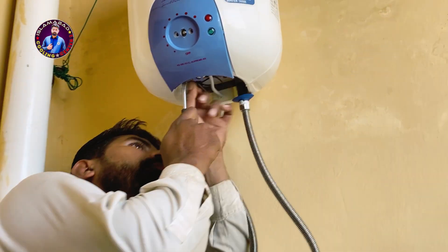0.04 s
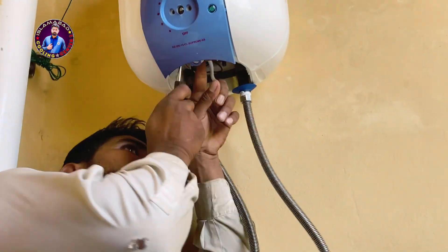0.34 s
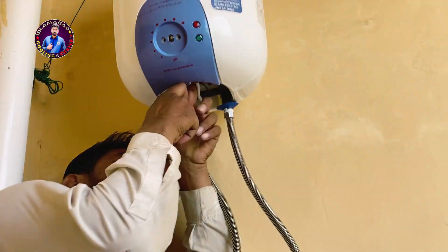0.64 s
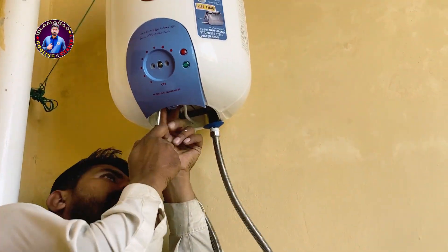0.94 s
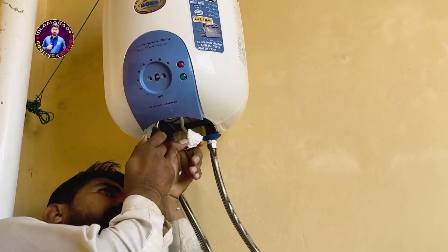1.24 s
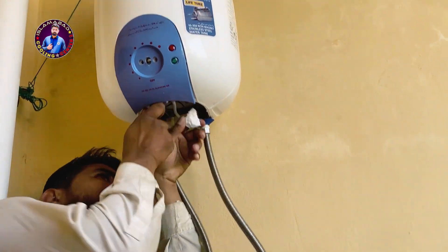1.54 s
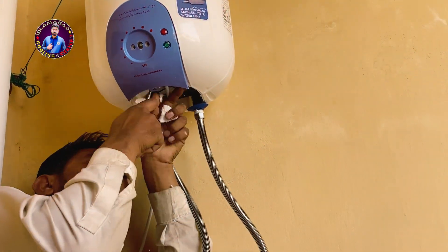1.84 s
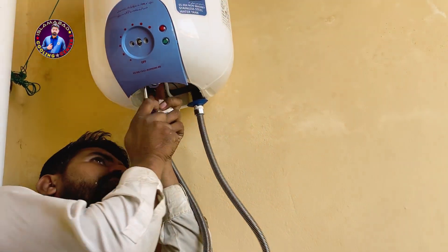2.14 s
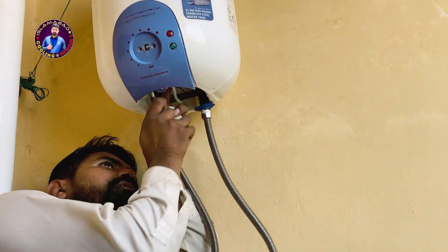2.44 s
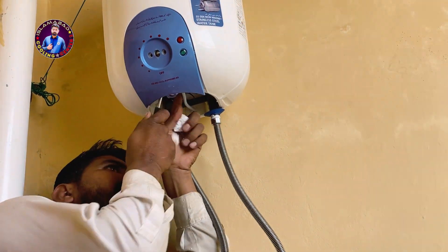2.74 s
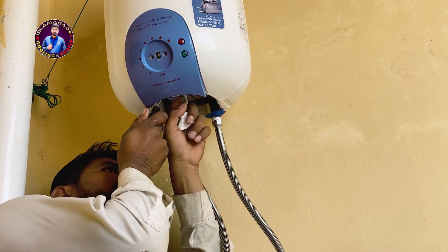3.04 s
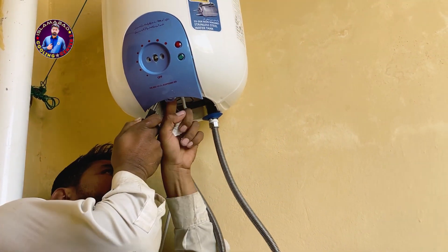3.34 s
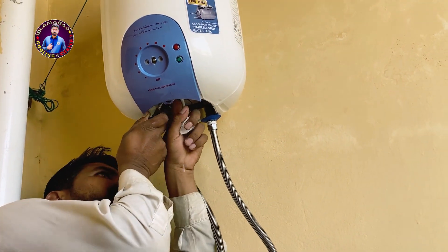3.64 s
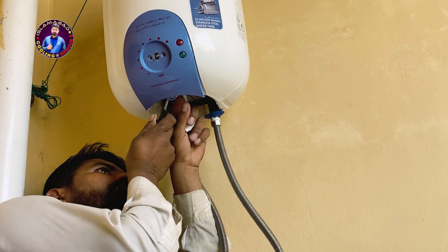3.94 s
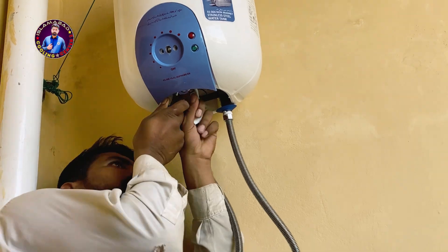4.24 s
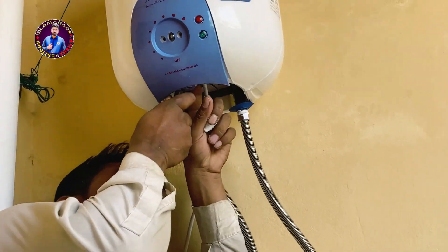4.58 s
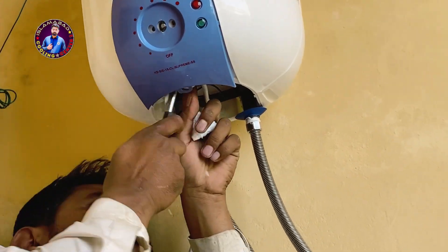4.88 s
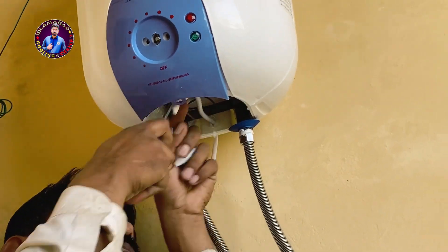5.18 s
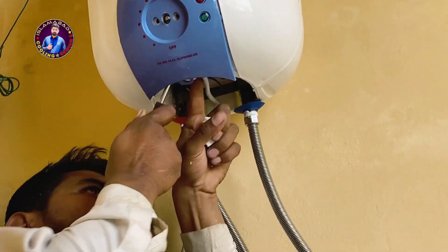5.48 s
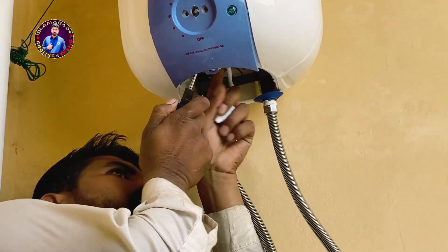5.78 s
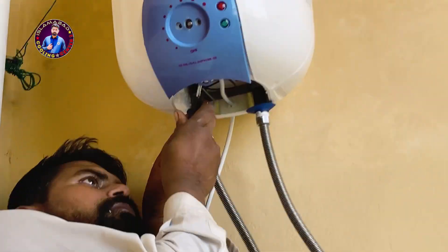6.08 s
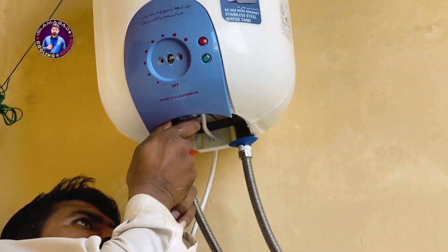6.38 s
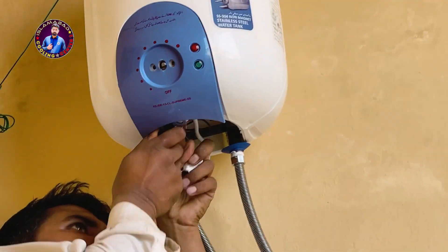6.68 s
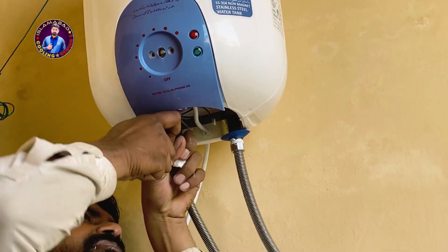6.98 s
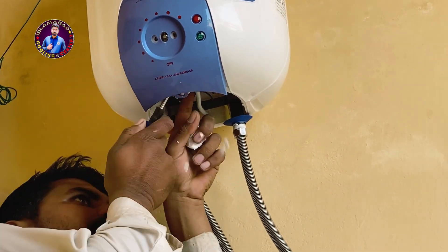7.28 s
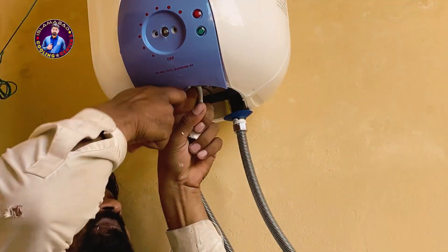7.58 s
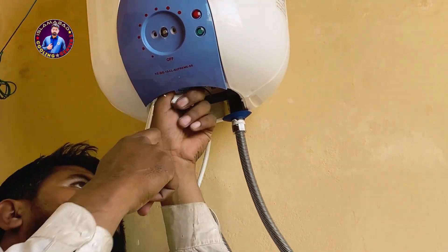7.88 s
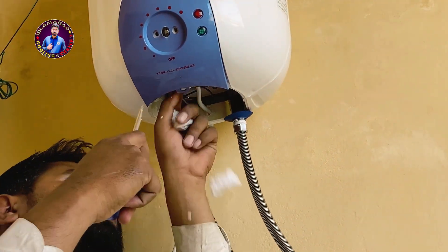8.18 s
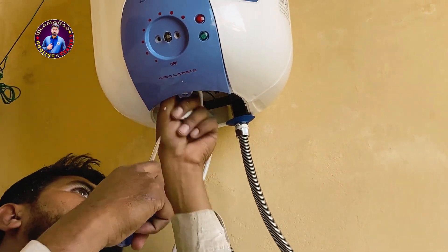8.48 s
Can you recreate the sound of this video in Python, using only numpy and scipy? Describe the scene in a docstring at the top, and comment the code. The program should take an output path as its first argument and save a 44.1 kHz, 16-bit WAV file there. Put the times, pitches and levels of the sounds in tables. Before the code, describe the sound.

Close up in a quiet room, a blade cracks through hard foam and knocks against a plastic shell in uneven clusters, with light scraping and ticking crumbs between. After a quieter stretch in the middle, the snaps build again, the loudest slightly overloading the microphone, with dull thuds and a soft drag of a hand. Light picks finish. A distant motor and brief gliding whistles are barely audible.

```python
"""Indoors at a wall-mounted water heater, microphone close: a screwdriver picks hard foam out of the
plastic housing. At first a motor revs far off while the blade snaps through the foam and knocks on the
shell, which rings briefly. Around 3 s the work is quieter: foam rasps, crumbs tick. Then more snaps,
hardest near 7 and 7.6 s, with dull thuds and a dragging hand; light picks end it. Throughout, loud snaps
overload the microphone, a noise suppressor hushes the pauses, and faint whistles glide now and then."""
import sys
import numpy as np
from scipy import signal
from scipy.fft import rfft, irfft
from scipy.io import wavfile
from scipy.ndimage import uniform_filter1d

SR = 44100
rng = np.random.default_rng(int(sys.argv[2]) if len(sys.argv) > 2 else 0)


def dump(signal):
    """Clip the signal to [-1, 1] and save it as 16-bit WAV at the path in sys.argv[1]."""
    limited = np.clip(np.atleast_2d(signal).T, -1, 1)
    pcm = np.round(limited * 32767).astype(np.int16)
    wavfile.write(sys.argv[1], SR, pcm)


N = 384552
TIME = np.arange(N) / SR
CUTOFF_HZ = 16000


# spectra of the splintering crack, clattering shell and hissing foam: (frequency [Hz], level [dB])
CRACK_SPECTRUM = [(100, -52), (600, -15.5), (1500, 2), (4400, -1.5), (6500, -22.5), (9000, -25.5),
                  (16000, -40)]
SHELL_SPECTRUM = [(100, -46.5), (350, -37.5), (480, -17.5), (900, -6), (1400, 1.5), (1850, -2), (2300, -5),
                  (4300, -8.5), (5200, -13.5), (6300, -33.5), (16000, -63.5)]
HISS_SPECTRUM = [(800, -38.5), (2000, -12), (4200, -1), (5400, -3), (6600, -12.5), (7800, -7), (8800, -2.5),
                 (10600, 1), (12500, -7), (15500, -15.5), (17000, -29.5)]
# blade snapping through foam; levels are relative within each column:
# (time [s], crack level [dB], ping pitch [Hz], shell level [dB], crunch level [dB])
BLADE_SNAPS = [(0.1714, -25.5, 1530, -47, -60), (0.3077, -20, 1460, -47, -59),
               (0.3417, 6.5, 2850, -14.5, -72), (0.4528, -14.5, 2010, -49, -71),
               (0.6868, 10.5, 9910, -50, -36), (0.7293, 3.5, 1670, -15, -24), (0.7502, 9.5, 2764, -15, -39),
               (0.8401, -23, 3920, -52, -76), (0.9366, -27.5, 1980, -50, -63), (1.27, -38, 1770, -51, -51),
               (1.4256, -11.5, 1840, -32.5, -53.5), (1.5098, -11.5, 1710, -28, -36),
               (1.5755, -18.5, 1070, -26.5, -71), (1.6367, 7.5, 8790, -50, -28),
               (1.6624, -2, 1750, -17, -41), (1.7443, 12.5, 1370, -9.5, -24.5),
               (1.7688, 10.5, 1400, -8, -21), (1.8863, -12, 1770, -31.5, -90.5),
               (2.1166, -8.5, 2480, -18.5, -62.5), (2.2784, -25, 855, -63, -58.5),
               (2.426, 8, 1796, -15, -50), (2.4778, -6, 1780, -22, -44), (2.5005, 3, 4190, -17, -29),
               (2.5307, -4.5, 1120, -17.5, -57), (2.5845, -4, 1620, -13, -25.5),
               (2.7132, -27.5, 1580, -36.5, -79.5), (2.9698, -27.5, 10480, -59, -49),
               (3.0144, -20.5, 1450, -25, -65), (3.058, -21, 1470, -33, -58),
               (3.361, -34, 1454, -41.5, -63.5), (3.461, -37.5, 1710, -52, -79.5),
               (3.5508, -23, 1230, -37, -57.5), (3.6447, -28, 3460, -42, -86),
               (3.7227, -33.5, 1440, -39.5, -59.5), (4.1856, -9.5, 1426, -28.5, -53),
               (4.2254, -27, 1580, -31.5, -66), (4.3082, -6.5, 1780, -21.5, -58),
               (4.388, -6.5, 1490, -21, -56), (4.6041, -17.5, 3980, -23, -45),
               (4.7479, 6.5, 1300, -3.5, -33), (4.8829, 4, 1655, -14, -40), (4.9327, -1.5, 2490, -18, -74),
               (5.0062, 1.5, 1666, -14, -39), (5.1228, -5.5, 1583, -30.5, -49),
               (5.4124, -34, 1106, -34.5, -64.5), (5.5062, -16.5, 1007, -23.5, -47.5),
               (5.6619, -24.5, 1540, -39.5, -85), (5.674, -19, 1510, -42, -85),
               (5.6959, -23.5, 1475, -42.5, -92), (5.7418, -21.5, 1604, -40, -76),
               (6.1253, -31.5, 1783, -40.5, -54), (6.1968, -16, 2800, -46.5, -75),
               (6.2558, -16, 1470, -17.5, -49.5), (6.2729, -8.5, 1880, -21.5, -69),
               (6.4238, -12, 1520, -49, -31), (6.4566, -6.5, 1360, -23, -39.5),
               (6.5253, -4.5, 1556, -27.5, -57), (6.5665, -23.5, 1430, -54, -75),
               (6.771, -14.5, 1376, -30, -64), (6.7898, -18, 1003, -43, -65), (6.9051, 0, 1720, -16, -24.5),
               (6.9423, 15, 1397, -10.5, -26), (7.1118, -11.5, 1710, -20.5, -68),
               (7.149, -13.5, 2000, -23, -81), (7.4242, -5.5, 1486, -20, -52),
               (7.5229, -15, 1320, -30, -61.5), (7.5859, 11.5, 1310, -14, -23),
               (7.6064, 10.5, 1380, -12.5, -24.5), (7.6266, 6.5, 4190, -13, -40),
               (7.9898, -19, 1430, -37, -52.5), (8.0139, -13.5, 1410, -23.5, -51.5),
               (8.0553, -13.5, 1724, -29, -61.5), (8.501, -20.5, 1570, -30, -68.5),
               (8.6071, -20, 1198, -46, -77)]
def snaps(rows):
    """Close up, each snap is a crack with a short ping, a knock on the shell and a crunch of torn cells."""
    t = np.arange(SR // 7) / SR
    crack, struck, crunch = np.zeros((3, N))
    ping_attack = (1 - np.exp(-t / 0.00026)) ** 2
    crunch_attack = 1 - np.exp(-t / 0.00009)
    clatter = coloured(from_db(3.4 * drift(260)) * grains(3000, 0.6, smooth=0.82), SHELL_SPECTRUM)
    for s, crack_db, ping_hz, shell_db, crunch_db in rows:
        add(struck, s, shell_knock(t, shell_db, clatter))
        # a gentle pick is mostly ping, and a longer one; only a hard pick splinters across the band
        ping_shape = ping_attack * decay(t, t60=0.0052 * (1 + 0.1048 * max(-crack_db, 0)))
        add(struck, s, from_db(crack_db + 4) * ping_shape * np.sin(2 * np.pi * ping_hz * t))
        splinter_db = crack_db - 8 + 0.36 * min(crack_db + 7.5, 0)
        splinter = decay(t, t60=0.011) * rng.standard_normal(len(t))
        add(crack, s, from_db(splinter_db) * hollow(splinter, depth=0.89))
        add(crunch, s, from_db(crunch_db + 13.5) * crunch_attack * decay(t, t60=0.05))
    # small parts radiate little bass
    struck = signal.sosfilt(signal.butter(3, 430, "high", fs=SR, output="sos"), struck)
    torn_cells = crunch * grains(3500, 3.5, smooth=0.5)
    return struck + coloured(crack, CRACK_SPECTRUM) + coloured(torn_cells, HISS_SPECTRUM)


# resonances of the plastic housing: (frequency [Hz], level [dB])
HOUSING_MODES = [(466, -25), (700, -7.5), (880, -11), (1074, -9), (1200, 1.5), (1250, -1.5), (1412, -2.5),
                 (1454, 3.5), (1573, -2.5), (1714, 2.5), (1802, -1), (2083, -9), (2252, -12.5), (2730, -2),
                 (3467, -6.5), (4122, -2.5)]
def shell_knock(t, shell_db, clatter, rebound_s=0.007, rebound_db=-9.5):
    """The blade strikes the shell, springs back and knocks again more softly; the shell rings."""
    mode_hz, mode_db = np.transpose(HOUSING_MODES)[:, :, None]
    # the ring takes a moment to spread, then cuts off quickly
    build_up = (1 - np.exp(-t / 0.0025)) ** 2
    cut_off = np.exp(-(t / 0.062) ** 4)
    # light touches ring more briefly than hard ones
    t60 = np.clip(0.05 + 0.0065 * (shell_db + 17.5), 0.05, 0.1)
    ring = build_up * cut_off * decay(t, t60)
    rebound = from_db(rebound_db) * np.interp(t - rebound_s, t, ring)
    # where the blade lands decides which modes answer
    strengths = from_db(mode_db + 4.6 * rng.standard_normal(mode_db.shape))
    # the blade keeps chattering against the shell and knocks each mode out of phase
    phase = rng.uniform(0, 2 * np.pi, mode_hz.shape)
    chatter = np.cumsum(0.045 * rng.standard_normal((len(mode_hz), len(t))), axis=1)
    modes = strengths * np.sin(2 * np.pi * mode_hz * t + phase + chatter)
    tone = from_db(shell_db + 7.5) * modes.sum(0) / np.linalg.norm(strengths)
    at = rng.integers(N - len(t))
    rattle = from_db(shell_db + 4.5) * hollow(clatter[at:at + len(t)], depth=1.0)
    knock = np.hypot(ring, rebound) * (tone + rattle)
    # a gentle touch is a soft contact, and the shell answers it without treble
    contact_hz = np.clip(14000 * 2 ** (shell_db / 13), 2297, CUTOFF_HZ)
    return signal.lfilter(*signal.butter(2, contact_hz, fs=SR), knock)


# spectrum of foam rasping against the shell: (frequency [Hz], level [dB])
RASP_SPECTRUM = [(300, -33), (700, -11), (1100, -11), (1500, 1.5), (2200, -9), (3000, -8.5), (4400, -12.5),
                 (5500, -15), (7000, -20.5)]
# blade and fingers pushing through foam: (start [s], end [s], rasp level [dB], hiss level [dB])
FOAM_STROKES = [(0.172, 0.223, -56, -54.5), (0.365, 0.423, -41, -53), (0.486, 0.709, -46.5, -61.5),
                (0.677, 0.743, -28.5, -31.5), (0.802, 0.847, -51, -44), (0.973, 1.027, -49, -56.5),
                (1.088, 1.189, -51.5, -42.5), (1.365, 1.472, -50.5, -65), (1.49, 1.55, -21, -48),
                (1.575, 1.694, -39, -43.5), (2.053, 2.272, -47, -65), (2.343, 2.434, -54, -58),
                (2.456, 2.635, -31.5, -43), (2.79, 2.958, -52, -80), (2.971, 3.142, -42, -61.5),
                (3.228, 3.414, -52.5, -71), (3.511, 3.599, -42, -63.5), (3.78, 4.15, -51, -76.5),
                (4.557, 4.769, -48, -62.5), (5.076, 5.184, -47, -54), (5.209, 5.248, -66, -55),
                (5.427, 5.643, -48, -70), (5.823, 6.101, -54, -70.5), (6.324, 6.381, -61.5, -50),
                (6.376, 6.513, -36.5, -55), (6.62, 6.66, -49, -56), (6.734, 6.941, -50, -65),
                (7.176, 7.231, -47.5, -58.5), (7.365, 7.46, -40.5, -60), (7.551, 7.67, -38, -54),
                (7.782, 7.977, -51, -64), (7.98, 8.063, -45.5, -56), (8.289, 8.393, -47, -64.5),
                (8.41, 8.584, -48.5, -61)]
def scraping():
    """The blade sticks and slips: a coarse rasp through the shell, a fine hiss straight from the foam."""
    coarse = rms_one(coloured(pitched_grains(750, 5400, per_s=300, cycles=16), RASP_SPECTRUM))
    fine = rms_one(coloured(pitched_grains(3200, 15000, per_s=1400, cycles=12), HISS_SPECTRUM))
    out = np.zeros(N)
    for start, end, rasp_db, hiss_db in FOAM_STROKES:
        stroke = swell(end - start, rise=0.026, fall=0.005)
        span = slice(int(start * SR), int(start * SR) + len(stroke))
        friction = from_db(rasp_db + 0.5) * coarse[span] + from_db(hiss_db + 5.5) * fine[span]
        add(out, start, stroke * hollow(friction, depth=0.54))
    grip = from_db(4.5 * drift(70))
    return grip * out


def crumbs(count=70):
    """Crumbs break off and tick during the strokes, louder under a harder one; rows for snaps()."""
    which, when, size, pitch, crisp = rng.random((count, 5)).T
    start, end, rasp_db, _ = np.array(FOAM_STROKES)[(which * len(FOAM_STROKES)).astype(int)].T
    times = start + (end - start) * when
    crack_db = rasp_db + 8 + 14.5 * size ** 2
    ping_hz = 1200 + 900 * pitch
    shell_db, crunch_db = crack_db - 17, crack_db - 50.5 + 18 * crisp
    return np.column_stack([times, crack_db, ping_hz, shell_db, crunch_db])


# short, dull thuds, mostly under snaps: (time [s], level [dB])
LOW_THUDS = [(0.004, -26), (2.505, -19.5), (4.385, -29.5), (4.932, -23.5), (6.452, -22.5), (6.523, -20.5),
             (7.149, -23), (7.424, -26), (7.626, -9)]
def thuds():
    """Quickly dying bursts of low noise give some snaps a dull body."""
    t, envelope = np.arange(SR // 5) / SR, np.zeros(N)
    for s, db in LOW_THUDS:
        add(envelope, s, from_db(db - 4) * decay(t, t60=0.072))
    band = signal.butter(3, [330, 850], "band", fs=SR, output="sos")
    white = rng.standard_normal(N)
    return signal.sosfilt(band, envelope * white) / np.std(signal.sosfilt(band, white))


# hands dragging over the housing: (start [s], end [s], level [dB])
HAND_DRAGS = [(7.383, 7.598, -41), (8.489, 8.582, -44.5)]
def drags():
    """Skin judders over the plastic: a dull, continuous scrape."""
    pressure = np.zeros(N)
    for start, end, db in HAND_DRAGS:
        add(pressure, start, from_db(db) * swell(end - start, rise=0.055, fall=0.043))
    band = signal.butter(3, [300, 1700], "band", fs=SR, output="sos")
    judder = signal.sosfilt(band, grains(760, 5.0, smooth=0.37))
    return pressure * rms_one(judder)


# faint, thin whistle tones: (start [s], end [s], middle pitch [Hz], level [dB], glide [Hz/s])
WHISTLE_TONES = [(0.795, 1.049, 3680, -61, 593), (1.505, 1.732, 3740, -50.5, 102),
                 (4.041, 4.157, 3480, -53.5, -500), (4.095, 4.278, 5500, -53.5, -2300),
                 (4.605, 4.717, 2280, -48.5, -500), (4.766, 4.965, 3420, -41, 902.5),
                 (5.486, 5.627, 4480, -48, -1300), (5.485, 5.563, 3160, -34.5, 194),
                 (5.857, 5.99, 2680, -53, -5000), (5.969, 6.084, 3400, -49.5, -900),
                 (7.822, 7.972, 3340, -53.5, -1400), (8.085, 8.222, 3750, -58, 1899.5)]
def whistles():
    """Now and then a faint, unsteady tone glides a little in pitch."""
    out, waver = np.zeros(N), 1 + 0.034 * drift(1100)
    for start, end, hz, db, glide in WHISTLE_TONES:
        shape = swell(end - start, rise=0.032, fall=0.069)
        from_middle_s = TIME[:len(shape)] - (end - start) / 2
        pitch = (hz + glide * from_middle_s) * waver[int(start * SR):][:len(shape)]
        add(out, start, from_db(db) * shape * np.sin(2 * np.pi * np.cumsum(pitch) / SR))
    return out * from_db(1.5 * drift(98))


# spectrum of the far murmur: (frequency [Hz], level [dB])
MURMUR_SPECTRUM = [(30, -23.5), (120, -14), (230, -14), (310, 2.5), (400, -11.5), (700, -14), (1500, -30),
                   (8000, -42)]
# rise and fall of the far murmur: (time [s], level [dB])
MURMUR_CONTOUR = [(0.0, -59), (0.36, -66.5), (1.79, -72.5), (3.41, -106), (4.26, -79), (5.99, -92),
                  (6.06, -76.5), (7.68, -77), (8.7, -108)]
# the distant motor speeding up: (start [s], end [s], first pitch [Hz], level [dB])
MOTOR_REVS = [(0.164, 0.553, 305, -58), (0.562, 0.812, 314, -50), (1.189, 1.976, 290, -64),
              (4.023, 4.36, 307, -68), (5.124, 5.323, 305, -67.5), (5.442, 5.72, 278, -70),
              (5.852, 6.244, 308, -64.5)]
def motor(climb_hz_per_s=72):
    """Far from the microphone, a hum swells and climbs in pitch with each rev, in a dull murmur."""
    hum, waver = np.zeros(N), 1 + 0.0017 * drift(68)
    for start, end, first_hz, db in MOTOR_REVS:
        shape = swell(end - start, rise=0.13, fall=0.11)
        pitch = (first_hz + climb_hz_per_s * TIME[:len(shape)]) * waver[int(start * SR):][:len(shape)]
        add(hum, start, from_db(db) * shape * np.sin(2 * np.pi * np.cumsum(pitch) / SR))
    murmur_db = 3.5 + np.interp(TIME, *np.transpose(MURMUR_CONTOUR))
    return hum + from_db(murmur_db) * coloured(rng.standard_normal(N), MURMUR_SPECTRUM)


def room_tone():
    """The quiet of the room: a faint steady hiss over a fainter murmur."""
    hiss = from_db(-69.5) * coloured(rng.standard_normal(N), CRACK_SPECTRUM)
    return hiss + from_db(-81.5) * coloured(rng.standard_normal(N), MURMUR_SPECTRUM)


# threshold of the microphone's noise suppressor: (frequency [Hz], level per bin [dB])
SUPPRESSOR_THRESHOLD = [(60, -100), (330, -81), (700, -71), (1500, -63), (4000, -73.5), (7000, -85),
                        (16000, -81.5)]
def suppressor(x, size=512, floor_db=-14):
    """Each band is turned down while it lies under the threshold."""
    hz, _, cells = signal.stft(x, SR, nperseg=size)
    power = uniform_filter1d(np.abs(cells) ** 2, size=5, axis=-2)
    limit = from_db(np.interp(hz, *np.transpose(SUPPRESSOR_THRESHOLD)))[:, None] ** 2
    gain = np.maximum(power ** 2 / (power ** 2 + limit ** 2), from_db(floor_db))
    return signal.istft(cells * gain, SR, nperseg=size)[1][..., :N]


def grains(per_s, spread_db, smooth):
    """Random bursts of uneven size, as of breaking foam cells, over smooth friction noise; unit rms."""
    born, bursts = rng.random(N) < per_s / SR, np.zeros(N)
    size = rng.laplace(size=N)[born]
    bursts[born] = np.sign(size) * from_db(spread_db * np.minimum(np.abs(size), 4))
    return rms_one(rms_one(bursts) + smooth * rng.standard_normal(N))


def pitched_grains(low_hz, high_hz, per_s, cycles, count=14):
    """Each fragment of foam has a pitch of its own and rings for a few cycles; unit rms."""
    out = np.zeros(N)
    for hz in np.geomspace(low_hz, high_hz, count):
        radius, angle = from_db(-60 * hz / (cycles * SR)), 2 * np.pi * hz / SR
        bursts = grains(per_s / count, 4.7, smooth=0.3)
        ringing = signal.lfilter([1, 0, -1], [1, -2 * radius * np.cos(angle), radius ** 2], bursts)
        out += np.sqrt(hz) * rms_one(ringing)
    return rms_one(out)


def hollow(x, depth, count=3):
    """The cavity between hand and housing colours each touch with new, very short echoes; power is kept."""
    taps = np.zeros(SR // 500)
    taps[0] = 1
    taps[rng.integers(SR // 5000, SR // 700, count)] += depth * rng.choice([-1, 1], count)
    out = np.convolve(x, taps)[:len(x)]
    return out * np.sqrt(np.sum(x ** 2) / (np.sum(out ** 2) + 1e-20))


def coloured(x, spectrum, size=2048):
    """Causal minimum-phase filter with the given spectrum; white noise keeps its power."""
    hz, db = np.transpose(spectrum)
    bins = np.maximum(np.fft.rfftfreq(size, 1 / SR), 1)
    gain = from_db(np.interp(np.log(bins), np.log(hz), db))
    cepstrum = irfft(np.log(gain))
    cepstrum[1:size // 2] *= 2
    cepstrum[size // 2 + 1:] = 0
    response = irfft(np.exp(rfft(cepstrum)))
    return signal.oaconvolve(x, response / np.linalg.norm(response))[:N]


def swell(length, rise, fall):
    """Envelope of one movement; times in seconds."""
    t = np.arange(int(max(length, 0.01) * SR)) / SR
    fade_in = np.sin(np.pi / 2 * np.minimum(t / rise, 1))
    return fade_in * np.sin(np.pi / 2 * np.minimum((t[-1] - t) / fall, 1))


def decay(t, t60):
    """Amplitude of a free ring, 60 dB down after t60 seconds."""
    return np.exp(-np.log(1000) * t / t60)


def drift(per_s):
    """Random wander through per_s new values a second."""
    knots = rng.standard_normal(int(N / SR * per_s) + 2)
    return np.interp(TIME * per_s, np.arange(len(knots)), knots)


def from_db(db):
    """Decibels to gain."""
    return 10 ** (np.asarray(db) / 20)


def rms_one(x):
    """Scale to unit rms."""
    return x / np.sqrt(np.mean(x ** 2) + 1e-20)


def add(track, s, sound):
    """Mix a sound into a track at s seconds."""
    at = min(max(round(s * SR), 0), N)
    track[at:at + len(sound)] += sound[:N - at]


def scene():
    """Work on the heater close by, faint whistle tones and the far motor, over the quiet room; mono."""
    room = room_tone()
    close_work = snaps(BLADE_SNAPS) + snaps(crumbs()) + scraping() + thuds() + drags()
    return (close_work + whistles() + motor() + room)[None]


def record(dry):
    """The close microphone: weak sounds are suppressed, loud snaps clip, the highest treble is cut."""
    clipped = np.clip(suppressor(dry), -0.98, 0.98)
    return signal.sosfilt(signal.ellip(10, 0.1, 70, CUTOFF_HZ, fs=SR, output="sos"), clipped)


dry = scene()
out = record(dry)
dump(out)
```